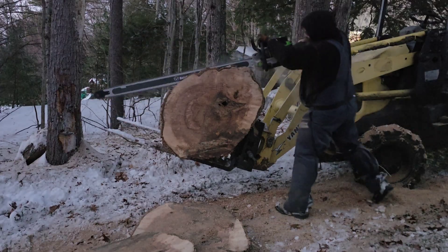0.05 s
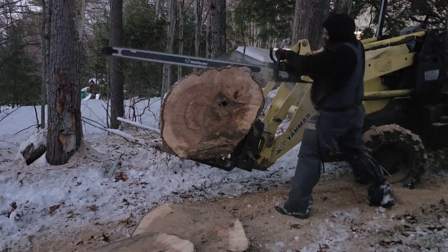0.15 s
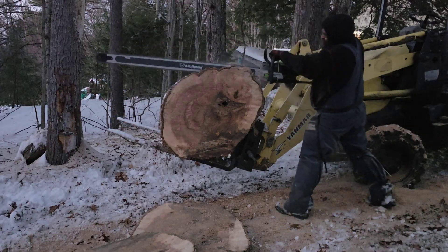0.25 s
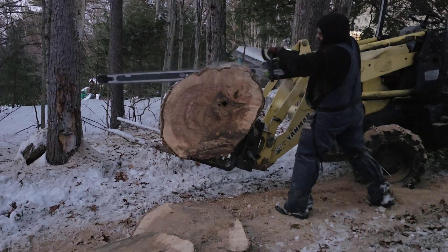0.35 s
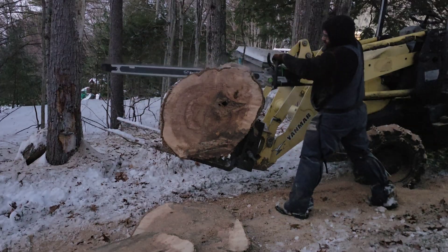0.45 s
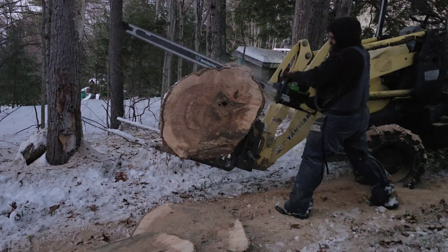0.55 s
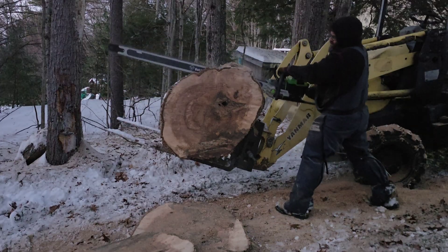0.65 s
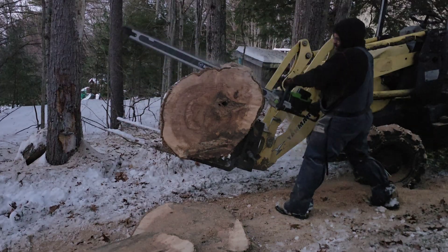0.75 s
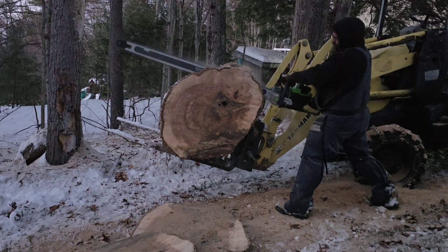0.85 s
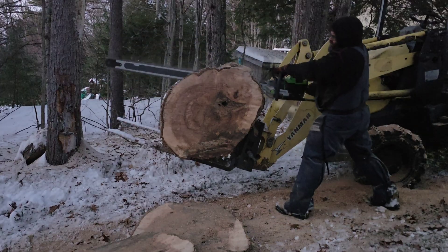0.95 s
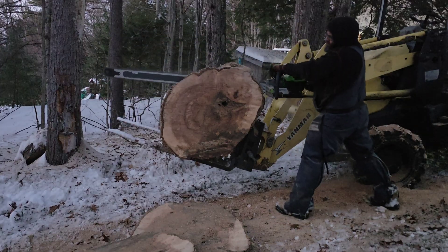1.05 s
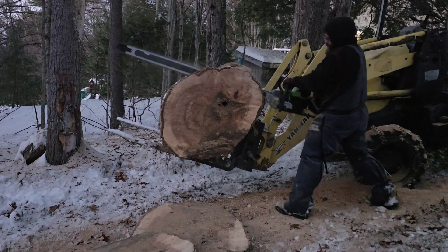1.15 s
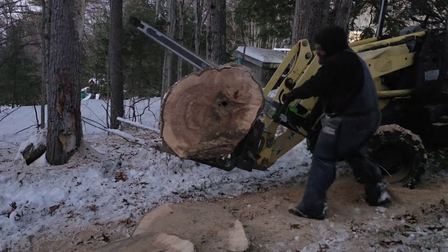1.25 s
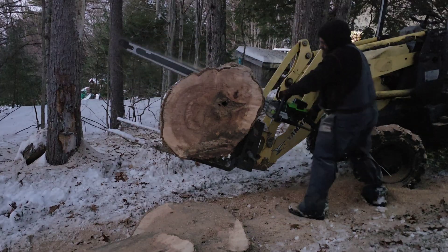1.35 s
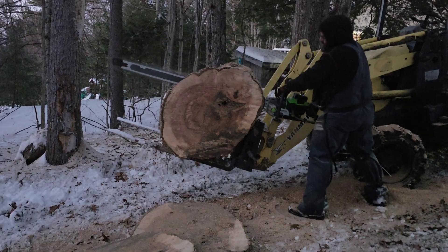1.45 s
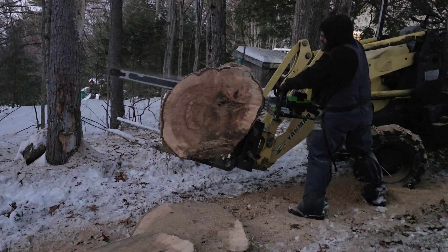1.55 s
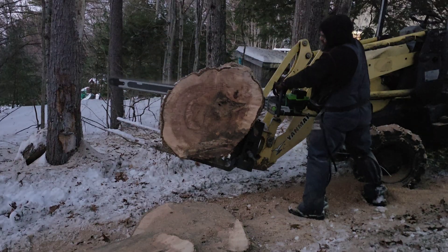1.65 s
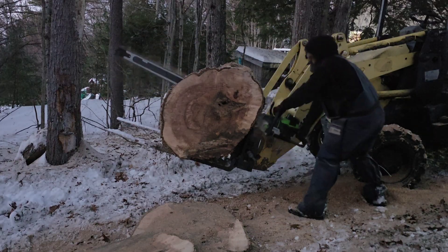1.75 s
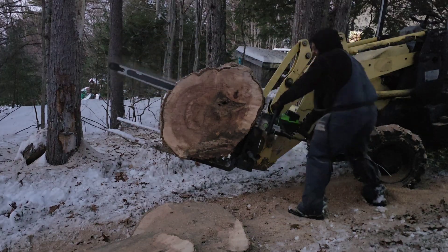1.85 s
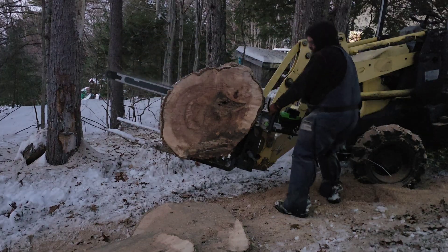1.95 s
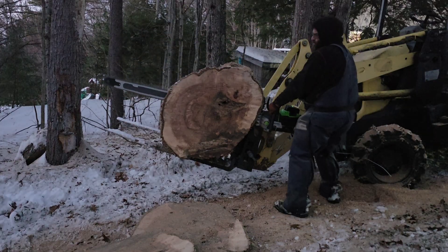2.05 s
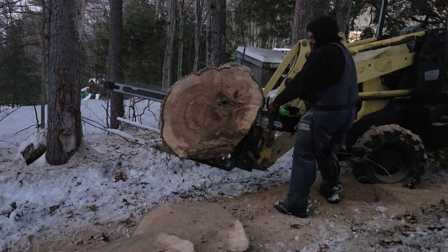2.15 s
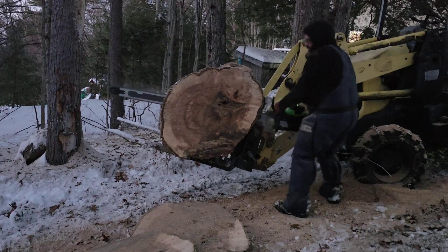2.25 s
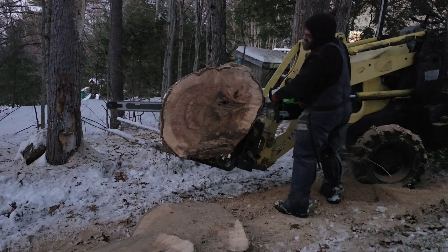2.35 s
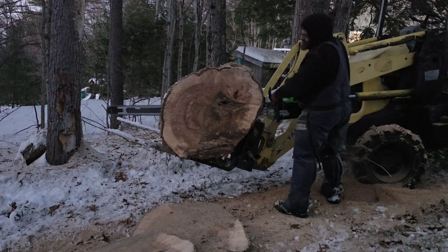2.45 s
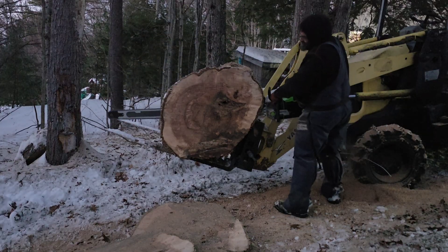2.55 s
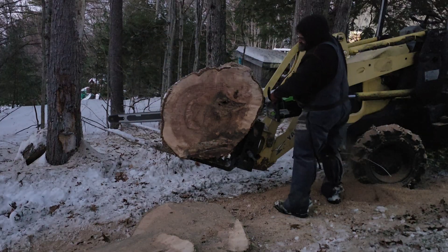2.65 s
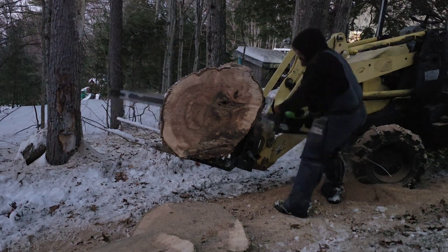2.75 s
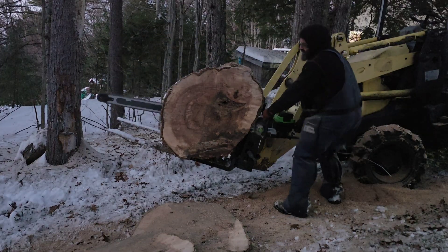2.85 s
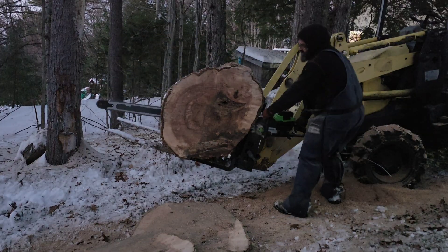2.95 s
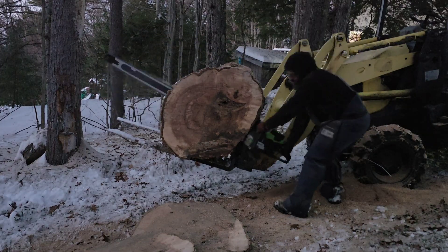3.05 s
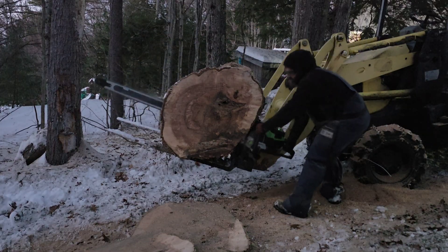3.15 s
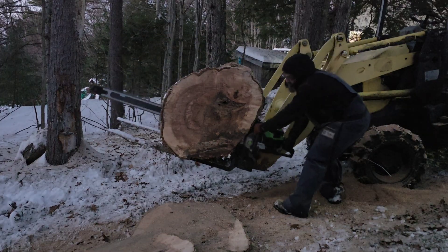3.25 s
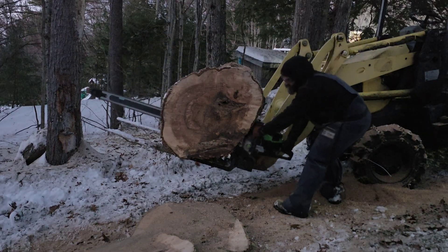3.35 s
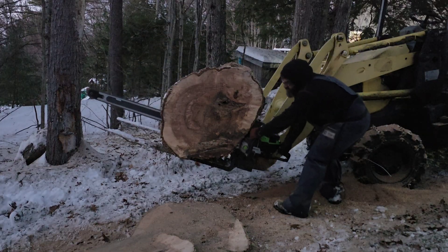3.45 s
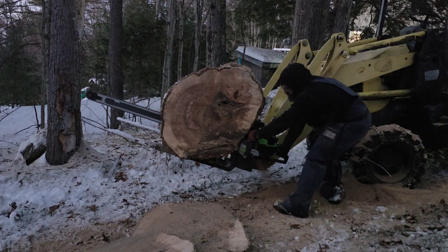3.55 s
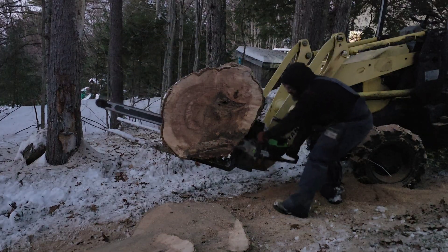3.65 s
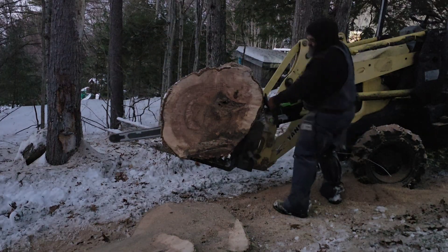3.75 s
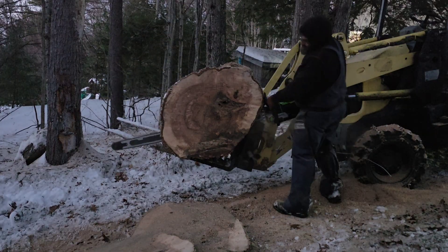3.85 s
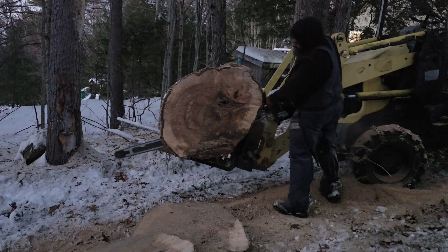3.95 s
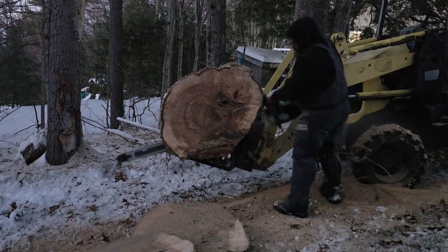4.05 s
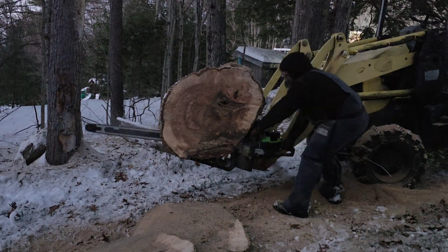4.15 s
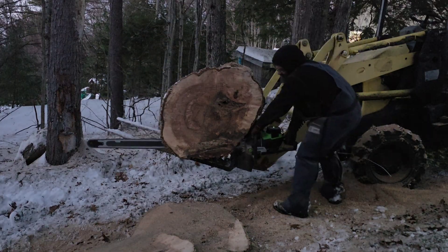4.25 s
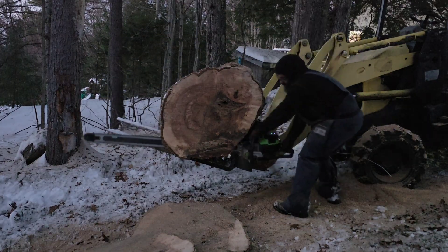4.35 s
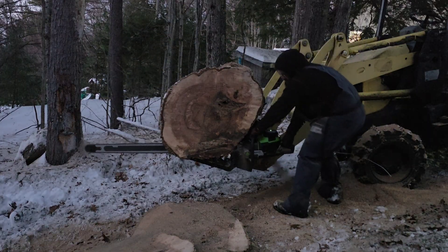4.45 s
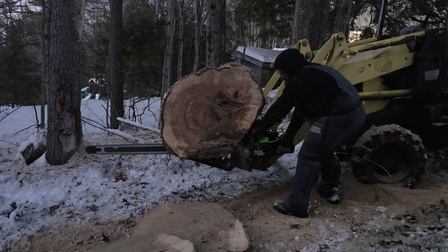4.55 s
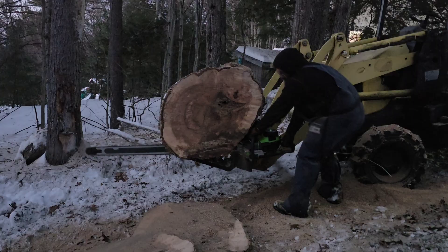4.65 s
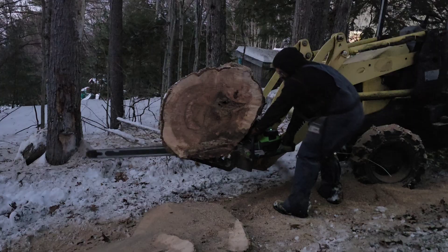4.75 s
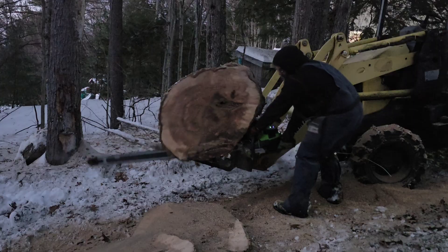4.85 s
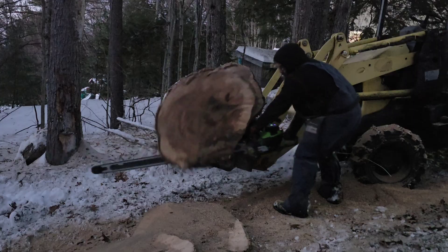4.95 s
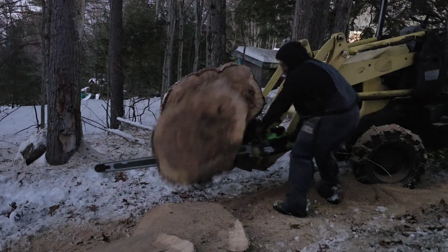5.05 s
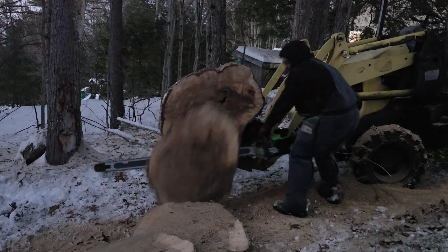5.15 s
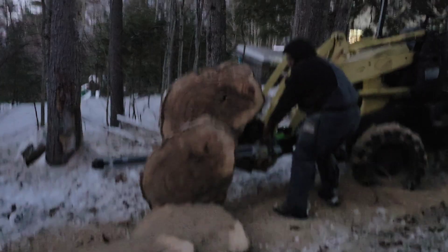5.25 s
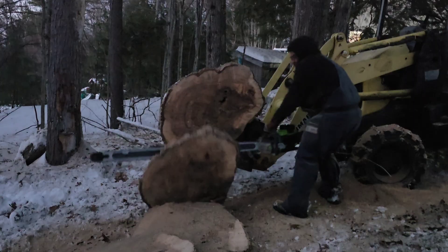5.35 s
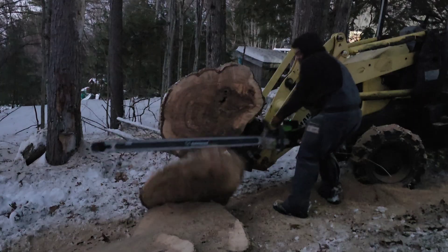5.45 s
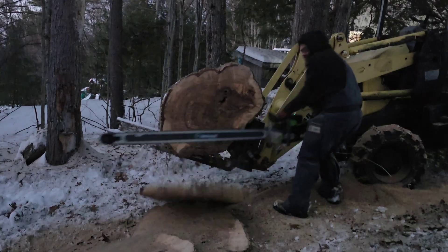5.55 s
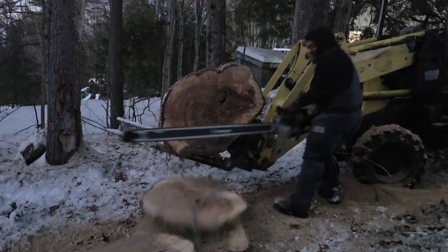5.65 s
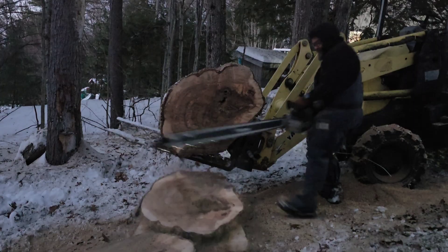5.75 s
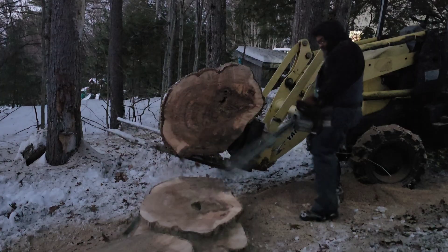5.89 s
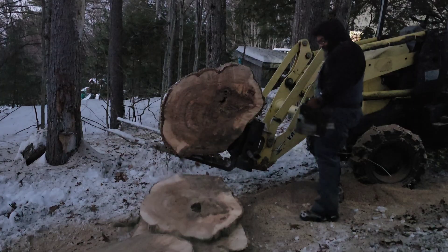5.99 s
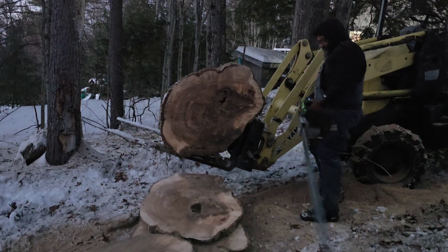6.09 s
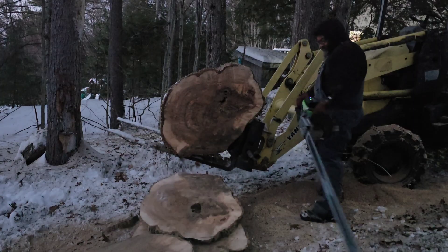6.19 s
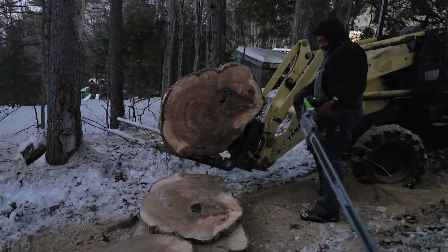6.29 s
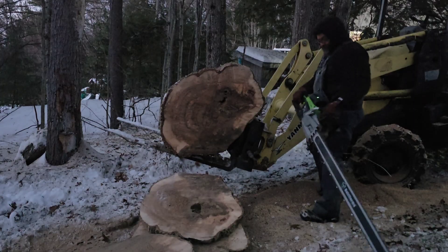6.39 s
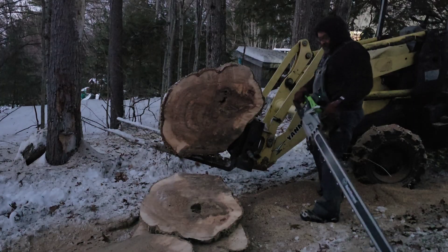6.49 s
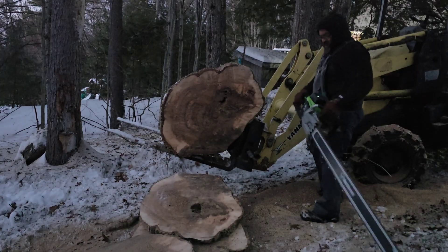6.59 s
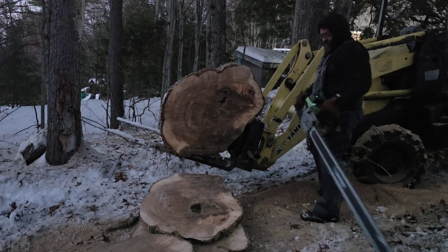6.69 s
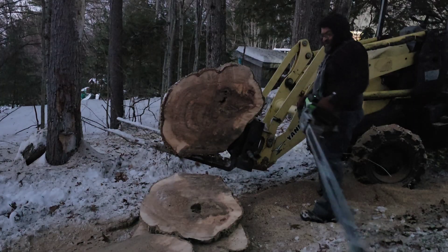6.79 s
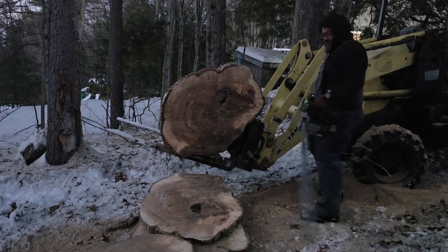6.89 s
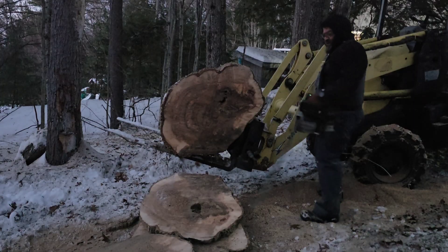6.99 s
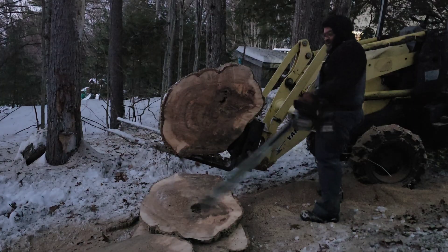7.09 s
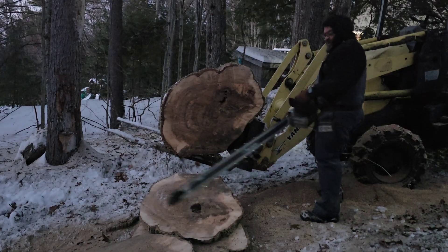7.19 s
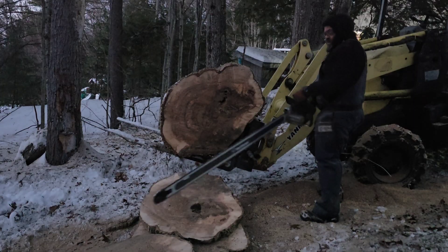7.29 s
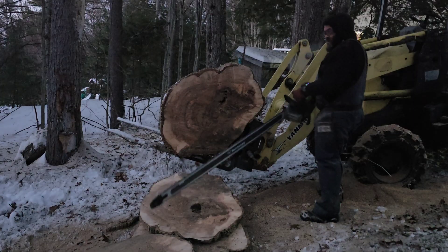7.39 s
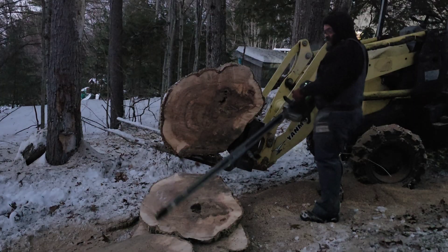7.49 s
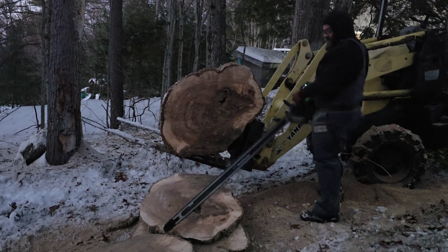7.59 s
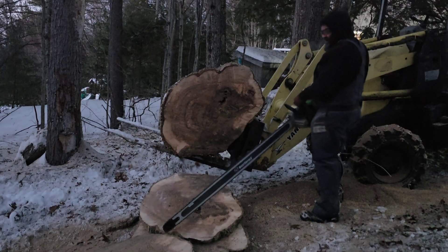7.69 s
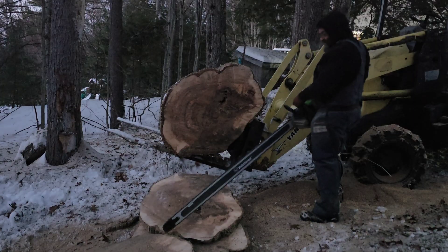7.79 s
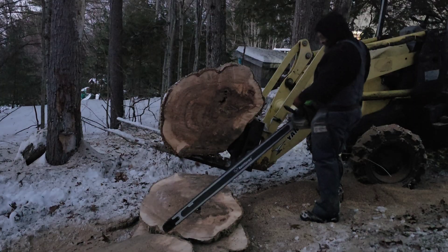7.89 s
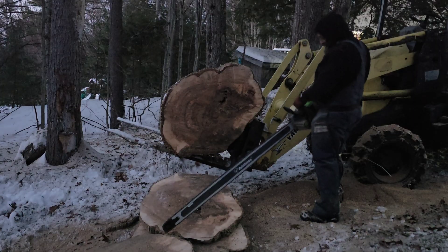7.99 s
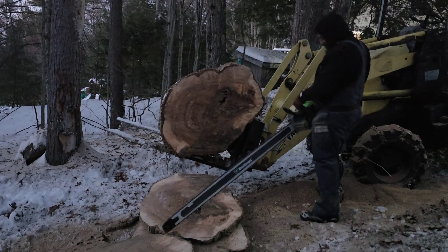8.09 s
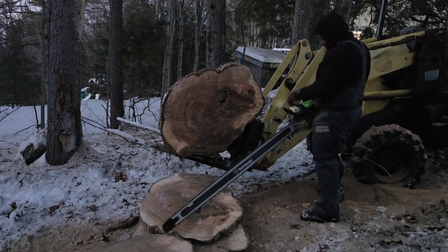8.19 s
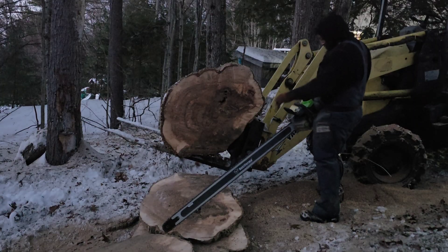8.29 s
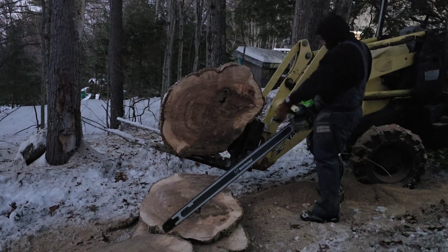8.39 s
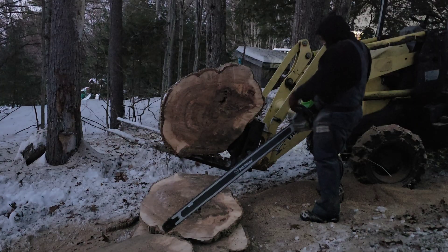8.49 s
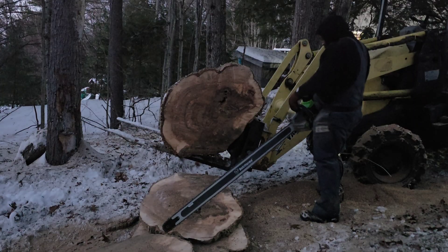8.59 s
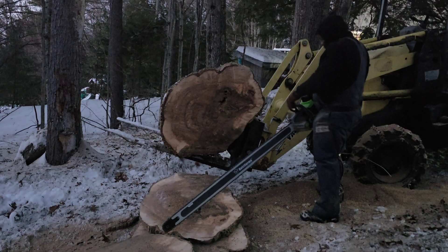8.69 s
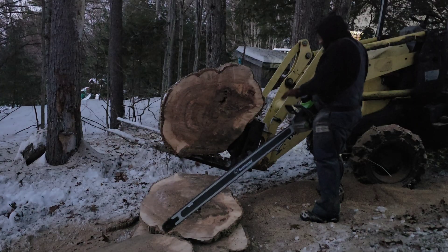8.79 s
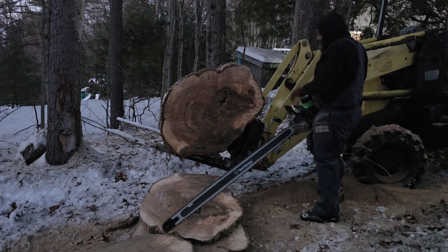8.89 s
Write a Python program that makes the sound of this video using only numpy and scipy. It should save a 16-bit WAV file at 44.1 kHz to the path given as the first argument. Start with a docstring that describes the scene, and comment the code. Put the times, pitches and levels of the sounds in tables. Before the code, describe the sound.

In snowy woods, an electric saw grinds through a log with no engine roar, only fluttering chain tones, woody drone and chip hiss. It bogs down, surges and stalls abruptly. The freed slab lands with a deep boom, bumps, and topples with a hard wooden clap, bark bits trickling and trunks echoing faintly. Over a soft distant rush come a bar knock and brief metallic clicks, heard from nearby.

```python
"""A battery chainsaw with a long bar cuts a slab off a thick log in snowy woods: tones locked to the
link rate sing over noise pulsed by the cutters. The chain snatches as the slab comes free and stops.
The slab thuds on its edge and topples onto other slabs and rocks: decaying sines, struck modes, clicks
and showers of crumbs. The bar is set down on it and the chain gives a last jerk. Trunks echo the
impacts; a far rush of noise fills the woods."""
import sys
import numpy as np
from scipy import signal
from scipy.fft import rfft, irfft
from scipy.io import wavfile

SR = 44100
rng = np.random.default_rng(int(sys.argv[2]) if len(sys.argv) > 2 else 0)


def log_audio(samples):
    """Write samples as a 16-bit WAV file to the path given in sys.argv[1]."""
    # one column per channel
    frames = np.atleast_2d(samples).T
    # limit to full scale, then quantise
    limited = np.clip(frames, -1, 1)
    pcm = np.round(limited * 32767).astype(np.int16)
    wavfile.write(sys.argv[1], SR, pcm)


N = 393813
TIME_S = np.arange(N) / SR
BIN_HZ = np.maximum(np.fft.rfftfreq(N, 1 / SR), 1)

# Chain tones, relative levels: link_rate_multiple, level_db
CHAIN_TONES = [(.5, -9.5), (1, 9), (2, -3), (3, -17)]
# Motor whine, relative levels: link_rate_multiple, level_db
MOTOR_TONES = [(1.66, -9), (2, -3), (2.43, 0), (3, -10)]
# Cut, before trim, load and bite: time_s, log_drone_db, kerf_rasp_db, chip_spray_db
CUT_LEVELS = [(0.0, -60, -40, -43.5), (0.21, -44.5, -39, -44), (0.37, -43.5, -40.5, -44.5),
              (0.44, -42.5, -40, -45.5), (2.31, -46.5, -42, -47), (2.47, -44, -42, -45.5),
              (3.31, -46, -40.5, -44.5), (3.91, -41.5, -43.5, -45.5), (4.2, -48.5, -40, -44),
              (4.31, -43.5, -40, -43.5), (4.87, -52, -42, -42.5), (5.01, -41, -38, -42),
              (5.08, -48, -40.5, -41.5)]
# Spectra of the cut's layers: freq_hz, relative_level_db
DRONE_COLOUR = [(40, -72.5), (100, -55.5), (180, -30), (250, -5), (310, 0.5), (430, 5), (540, 8),
                (620, 3.5), (850, -17)]
RASP_COLOUR = [(450, -32.5), (620, -7.5), (750, -2.5), (870, 1), (1050, -4), (1300, -2.5), (1600, -4.5),
               (1900, -9.5), (2300, -7.5), (2700, -14), (3100, -11), (3800, -39.5)]
SPRAY_COLOUR = [(1650, -28), (2800, -7), (3150, 0), (3900, -2), (4700, 0), (6000, -2), (9000, -1),
                (16000, -6)]
# Spectrum of the snatch: freq_hz, relative_level_db
SNATCH_COLOUR = [(35, -62), (60, -30.5), (189, -26.5), (330, -11), (448, -15.5), (480, -9.5), (842, -5.5),
                 (1090, -8.5), (1580, -7.5), (1950, -15.5), (3670, -13), (10800, -19), (16000, -22.5)]
# Left-right likeness of the saw and crumbs: freq_hz, correlation
SAW_LIKENESS = [(130, 1), (640, 0.96), (1410, 0.94), (3100, 0.43), (6800, 0.32), (15000, 0.25)]
# Brief dips in saw level: centre_s, depth_db, half_width_s
LEVEL_DIPS = [(.34, 5, 0.015), (2.881, 3, 0.02), (3.13, 4, 0.013), (3.6, 3.5, 0.012), (4.402, 13, 0.0065)]
# Saw rocked into the wood, chain dragged down then let go:
# deepest_s, press_s, recovery_s, load_0_to_1, chain_tone_db
BITES = [(.25, .25, .18, .47, -52), (.64, .2, .06, 0.05, -43.5), (0.841, .14, .08, .7, -48.5),
         (1.17, .25, .12, .68, -43.5), (1.5, .18, .16, .66, -57), (1.75, .17, .07, .78, -41.5),
         (1.9, .07, .04, 0.35, -42), (2.032, .09, .08, .45, -55), (2.18, 0.0709, .07, .25, -44.5),
         (2.33, .07, .06, .58, -45.5), (2.72, .4, .07, .28, -44), (2.96, .16, .09, .7, -45.5),
         (3.25, .2, .1, .33, -52.5), (3.551, .2, .07, .62, -49.5), (3.911, .16, .33, .68, -42)]
# Steady push through the last sliver: time_s, load_0_to_1, chain_tone_db, motor_whine_db
LAST_PUSH = [(4.39, 0.02, -46.5, -73), (4.41, .7, -46, -57), (4.52, .75, -41, -57), (4.62, .94, -53, -53.5),
             (4.88, 1, -54, -50), (5.0, .68, -40.5, -52), (5.05, .38, -45, -65), (5.1, .06, -42, -39),
             (5.149, 0.04, -37, -62)]
# Hum of the half-freed slab, lower late in the cut: time_s, pitch_hz, purity_0_to_1, level_db
SLAB_HUM = [(0, 384.2, 0.18, -42.5), (1.6, 390.5, 0, -45.5), (2.55, 407.3, 0.24, -45.5),
            (3.1, 329.4, 0.02, -51), (4.85, 302.8, .2, -48.5), (4.96, 295, 0.85, -39.5),
            (5.13, 325.2, .3, -60.5)]
# Ringing of the long bar: time_s, level_db
BAR_RING = [(0, -49), (.65, -41.5), (1.75, -49), (2.4, -60), (3.0, -58), (3.5, -46), (3.9, -61)]
# Far rush in the woods, spectrum: freq_hz, relative_level_db
AIR_COLOUR = [(25, -24), (45, -24.5), (110, -10.5), (200, -8), (265, -4.5), (340, -5.5), (440, -7),
              (515, -3.5), (600, -7.5), (880, -4.5), (1600, -14.5), (2300, -18.5), (3300, -31), (6000, -43),
              (16000, -71)]
# Far rush, level: time_s, level_db
AIR_LEVEL = [(0, -99), (5.3, -50.5), (6.6, -52.5), (7.3, -51), (8.1, -50.5), (8.9, -49)]
# Far rush, left-right likeness: freq_hz, correlation
AIR_LIKENESS = [(60, 0.92), (180, 0.93), (550, 0.4), (1650, -0.54), (5000, -0.69), (15000, -0.2)]
# Last fibres and bark snapping: start_s, level_db
SNAPS = [(5.26, -32), (5.271, -37), (5.337, -33.5), (5.349, -45), (5.402, -47.5), (5.469, -49.5)]
# Showers of sawdust and bark crumbs, later a faint rustle: thickest_s, level_db, rise_s, t60_s
CRUMB_SHOWERS = [(5.3, -37, 0.018, 0.91), (5.69, -52, 0.077, 0.89), (5.96, -46.5, 0.035, 1.2),
                 (6.7, -67.5, 0.36, 2.7), (7.18, -63.5, 0.22, 3), (8.19, -70.5, .04, 0.58)]
# Spectrum of the crumbs: freq_hz, relative_level_db
CRUMB_COLOUR = [(500, 4.5), (2500, -9), (16000, -18.0)]
# Blows on wood: start_s, level_db, dull_above_hz, contact_t60_s
KNOCKS = [(5.324, -23.5, 440, 0.04), (5.415, -38.5, 370, 0.091), (5.602, -32.5, 616, 0.082),
          (5.665, -22.5, 2470, 0.028), (5.838, -15, 1500, 0.05), (5.844, -11, 1110, 0.021),
          (5.864, -22, 726, 0.14), (5.958, -32, 350, 0.17), (5.99, -34, 294, 0.12), (6.17, -37, 282, 0.21),
          (6.389, -43.5, 3900, 0.025), (7.726, -14.5, 853, 0.026), (7.756, -31.5, 694, 0.037),
          (8.566, -40, 1800, .07), (8.617, -39.5, 3570, 0.052), (8.877, -40, 2490, 0.034)]
# Modes of the slab: freq_hz, relative_level_db, t60_s
SLAB_MODES = [(156.3, -0.5, 0.16), (202.4, -0.5, 0.11), (266, -1.5, 0.123), (312, -7.5, 0.08),
              (408, 2.5, 0.029), (504, 0, 0.049), (634, 0.5, 0.014), (737, -1.5, 0.051), (864, -13, 0.056),
              (930, -6, 0.047), (1052, -7, 0.033), (1325, -3.5, 0.033), (1670, -24, 0.13)]
# Clicks of chain, bark and grit: start_s, level_db, t60_s, dull_above_hz
CLICKS = [(5.328, -34, 0.11, 5860), (5.401, -41.5, 0.14, 2130), (5.503, -52.5, 0.024, 4440),
          (5.602, -44, 0.09, 8900), (5.665, -39.5, 0.057, 5200), (5.842, -47.5, .05, 4940),
          (5.861, -53.5, 0.87, 2200), (6.389, -58, .025, 3970), (6.463, -47, 0.4, 8330),
          (7.726, -35, 0.15, 8910), (7.76, -33.5, 0.028, 10500), (7.807, -37.5, 0.061, 9700),
          (8.547, -54.5, 0.25, 6960), (8.581, -46, 0.11, 13900), (8.6159, -27.5, 0.018, 13000),
          (8.624, -39, 0.13, 12900), (8.882, -55, 0.079, 8750)]
# Weight meeting the ground: start_s, level_db, pitch_hz, t60_s
THUDS = [(5.336, -0.5, 85, 0.085), (5.608, -10.5, 67, 0.064), (5.674, -25, 58.5, 0.071),
         (5.84, -5.5, 100, 0.048), (5.952, -20, 126, 0.11), (5.997, -21.5, 133, 0.099),
         (6.172, -27.5, 129, 0.23), (6.19, -31, 71, 0.2), (7.726, -18, 123.6, 0.2)]
# Decay of the woods' echo: freq_hz, t60_s
WOODS_T60 = [(60, 0.47), (300, 0.16), (1200, 0.75), (4000, 0.44), (14000, 0.36)]
# Response of the two microphone ports: freq_hz, left_db, right_db
PORTS = [(300, -1.66, -2.5), (1300, 0.5, -1.14), (2200, 1.34, -1.6), (5900, -2.5, -6.5), (7600, -1.5, -8),
         (9940, -1, -21), (10740, -9, -12), (11900, -4, -10.5), (15500, 3.5, -6.5)]

FLUTTER_HZ, FLUTTER_END_S = 43.07, 4.4
# drive links passing the sprocket with no load, and the loss at full load
FREE_LINKS_PER_S, SAG_LINKS_PER_S = 1230, 400
# change at full load: a laden chain sounds deeper
DRONE_LOAD_DB, RASP_LOAD_DB, SPRAY_LOAD_DB = 3.5, -2.5, -2
# log thrum: level at start unloaded, gain at full load, growth as the cut deepens
THRUM_DB, THRUM_LOAD_DB, THRUM_DB_PER_S = -74.5, 4, 2
# the chain snatches at the loose slab and stalls
SNATCH_S, SNATCH_ATTACK_S, SNATCH_FADE_S, STALL_S = 5.146, .022, 0.067, .1
SNATCH_DB, SNATCH_TONE_DB = -16, -23
# the chain's last jerk
JERK_S, JERK_WIDTH_S, JERK_DB, JERK_LINKS_PER_S, JERK_SLOWING_S = 8.665, 0.037, -43, 460, 0.8
# low rumble after every thud; level relative to the thud
GROUND_HZ, GROUND_WIDTH_HZ, GROUND_DB, GROUND_T60_S, GROUND_RISE_S = 54, 19.5, -13.5, 0.47, 0.016


def from_db(db):
    """Decibels to gain."""
    return 10 ** (np.asarray(db) / 20)


def decay(t, t60_s):
    """Exponential decay, 60 dB per t60."""
    return from_db(-60 * t / t60_s)


def rise(t, rise_s):
    """Exponential approach to 1."""
    return 1 - np.exp(-t / rise_s)


def bump(centre_s, width_s):
    """Gaussian bump in time, peak 1."""
    return np.exp(-((TIME_S - centre_s) / width_s) ** 2)


def rms_one(x):
    """Scale to unit power."""
    return x / np.sqrt(np.mean(x ** 2) + 1e-20)


def in_time(rows):
    """Each column of a curve, sample by sample."""
    s, *columns = np.transpose(rows)
    return [np.interp(TIME_S, s, column) for column in columns]


def at_hz(points, hz):
    """Read a table on a log-frequency axis."""
    table_hz, value = np.transpose(points)
    return np.interp(np.log(hz), np.log(table_hz), value)


def phase(hz):
    """Integrate frequency to radians."""
    return 2 * np.pi * np.cumsum(hz) / SR


def drift(rate_hz):
    """Low-passed noise, rms 1, computed at an eighth of the sample rate."""
    pole = np.exp(-16 * np.pi * rate_hz / SR)
    noise = rng.standard_normal(N // 8 + 2002)
    slow = signal.lfilter([1], [1, -2 * pole, pole * pole], noise)[2000:]
    return np.interp(np.arange(N) / 8, np.arange(len(slow)), rms_one(slow))


def blurred(turn, width_hz):
    """A tone smeared into a narrow band, with the power of a unit sine."""
    return (drift(width_hz) * np.sin(turn) + drift(width_hz) * np.cos(turn)) / np.sqrt(2)


def filtered(x, hz, kind, order=2):
    """Causal Butterworth filter."""
    sos = signal.butter(order, np.clip(hz, 10, .45 * SR), kind, fs=SR, output="sos")
    return signal.sosfilt(sos, x + 1e-18)


def coloured(colour, likeness, drive=1):
    """Stereo noise, pulsed by the drive and then shaped by a spectrum; the middle has rms 1."""
    mid, side = rfft(rng.standard_normal((2, N)) * drive)
    alike = np.clip(at_hz(likeness, BIN_HZ), -.9, .999)
    pair = np.sqrt(1 + alike) * mid + np.sqrt(1 - alike) * side * [[1], [-1]]
    out = irfft(pair * from_db(at_hz(colour, BIN_HZ)), N)
    return out / out.mean(axis=0).std()


def add(track, s, sound):
    """Mix a sound in at a time."""
    part = track[round(s * SR):][:len(sound)]
    part += sound[:len(part)]


def at_level(hit, db):
    """Set the rms of a hit's first fiftieth of a second."""
    return from_db(db) * hit / hit[:SR // 50].std()


def chain_load():
    """Chain load, 0-1: each bite ramps up and lets go, then comes the last push."""
    load = in_time(LAST_PUSH)[0]
    for s, press_s, recovery_s, bite_load, _ in BITES:
        load = load + bite_load * np.interp(TIME_S, [s - press_s, s, s + recovery_s], [0, 1, 0])
    return load


def chain_speed(load):
    """Links per second: the chain sags under load, stalls after the snatch and twitches once more."""
    stalled_s = np.maximum(TIME_S - SNATCH_S - SNATCH_ATTACK_S, 0)
    running = (FREE_LINKS_PER_S - SAG_LINKS_PER_S * load) * np.exp(-stalled_s / STALL_S)
    jerk_s = np.maximum(TIME_S - JERK_S, -2 * JERK_WIDTH_S)
    jerk = JERK_LINKS_PER_S * np.exp(-jerk_s / JERK_SLOWING_S)
    return np.where(TIME_S < (SNATCH_S + JERK_S) / 2, running, jerk)


def snatch_force():
    """The snatch grips fast and fades as the chain stalls, 0-1."""
    t = TIME_S - SNATCH_S
    fade = np.exp(-(np.maximum(t - SNATCH_ATTACK_S, 0) / SNATCH_FADE_S) ** 2)
    return np.clip(t / SNATCH_ATTACK_S, 0, 1) * fade


def kerf_noise(load, teeth, bite_db=1.05, drone_trim_db=-2.0, rasp_trim_db=-0.5, spray_trim_db=5.0):
    """Cutter-pulsed noise: the log drones, the kerf rasps, chips spray."""
    drone_db, rasp_db, spray_db = in_time(CUT_LEVELS)
    # hard and soft wood make the bite uneven
    bite = bite_db * drift(22)
    drone_gain = from_db(drone_db + drone_trim_db + DRONE_LOAD_DB * load + bite)
    rasp_gain = from_db(rasp_db + rasp_trim_db + RASP_LOAD_DB * load + bite)
    spray_gain = from_db(spray_db + spray_trim_db + SPRAY_LOAD_DB * load)
    drone = drone_gain * coloured(DRONE_COLOUR, SAW_LIKENESS, teeth)
    rasp = rasp_gain * coloured(RASP_COLOUR, SAW_LIKENESS, teeth)
    return drone + rasp + spray_gain * coloured(SPRAY_COLOUR, SAW_LIKENESS, teeth)


def resonances(load, bar_hz=870, bar_width_hz=55, slab_width_hz=70, log_hz=180, log_width_hz=28):
    """The cutters shake the slab, the bar and the log, each at its own pitch."""
    hz, purity, slab_db = in_time(SLAB_HUM)
    bar_db, = in_time(BAR_RING)
    thrum_db = THRUM_DB + THRUM_LOAD_DB * load + THRUM_DB_PER_S * TIME_S
    thrum_gain = from_db(thrum_db) * (TIME_S < FLUTTER_END_S)
    turn, purity = phase(hz), np.clip(purity, 0, 1)
    slab = np.sqrt(purity) * np.sin(turn) + np.sqrt(1 - purity) * blurred(turn, slab_width_hz)
    bar = blurred(2 * np.pi * bar_hz * TIME_S, bar_width_hz)
    log = blurred(2 * np.pi * log_hz * TIME_S, log_width_hz)
    # small parts radiate no bass
    small_parts = filtered(from_db(slab_db) * slab + from_db(bar_db) * bar, 235, "high", order=4)
    return np.sqrt(2) * (small_parts + thrum_gain * log)


def chain_song(links, turn, blur_share, grip, in_kerf, blur=0.55, blur_hz=42):
    """Link-rate tones sing in bites, last push, snatch and jerk; the motor whines above them."""
    # tones are smeared into narrow bands, most while the speed changes
    speed_change = np.minimum(np.abs(np.gradient(links)) * SR / 1500, 1)
    smear = blur * (blur_share / 2 + speed_change)
    tones = sum(from_db(db) * (np.sin(k * turn) + smear * blurred(k * turn, blur_hz))
                for k, db in CHAIN_TONES)
    tones = rms_one(tones / np.sqrt(1 + smear ** 2))
    motor = rms_one(sum(from_db(db + 2 * drift(31)) * np.sin(k * turn + .5 * drift(50))
                        for k, db in MOTOR_TONES))
    bite_tones = [(row[0], row[-1]) for row in BITES]
    push_tones = [(s, db) for s, _, db, _ in LAST_PUSH]
    sing_db, = in_time(bite_tones + push_tones)
    jerk = from_db(JERK_DB) * bump(JERK_S, JERK_WIDTH_S)
    sing = from_db(sing_db) * in_kerf + from_db(SNATCH_TONE_DB) * grip ** 2 + jerk
    whine_gain = from_db(in_time(LAST_PUSH)[2]) * in_kerf
    return sing * from_db(2.8 * blur_share * drift(26)) * tones + whine_gain * motor


def saw(flutter=0.13, slow_waver=.016, fast_waver=.012, tooth_bite=0.33, grain_db=-1.0):
    """Cutters tear chips at half the link rate, driving kerf noise, chain song and snatch."""
    load = chain_load()
    links, grip = chain_speed(load), snatch_force()
    fluttering = TIME_S < FLUTTER_END_S
    # the pitch wavers and blurs while the sound flutters, and is steadier after
    blur_share = np.where(fluttering, 1, .4)
    waver = fast_waver * drift(69.8) + slow_waver * drift(18)
    turn = phase(links * (1 + blur_share * waver))
    teeth = np.exp(tooth_bite * np.cos(turn / 2)) * from_db(grain_db * drift(500))
    in_kerf = np.interp(TIME_S, [5.17, 5.28], [1, 0])
    cutting = (kerf_noise(load, teeth) + resonances(load)) * in_kerf
    song = chain_song(links, turn, blur_share, grip, in_kerf)
    snatch = from_db(SNATCH_DB) * grip * coloured(SNATCH_COLOUR, SAW_LIKENESS, teeth)
    # level flutters quickly through most of the cut
    throb = 1 + flutter * fluttering * np.sin(2 * np.pi * FLUTTER_HZ * TIME_S)
    dips_db = sum(depth_db * bump(s, width_s) for s, depth_db, width_s in LEVEL_DIPS)
    return (cutting + song) * throb * from_db(-dips_db) + snatch


def air():
    """Far rush in the woods: coloured noise with a slowly moving level."""
    return from_db(in_time(AIR_LEVEL)[0]) * coloured(AIR_COLOUR, AIR_LIKENESS)


def crumbs(grain_db=2.5):
    """A fine patter follows the slab down; each shower swells and dies away."""
    showers = np.zeros(N)
    for s, db, rise_s, t60_s in CRUMB_SHOWERS:
        swell = np.exp(-(np.minimum(TIME_S - s, 0) / rise_s) ** 2)
        showers += from_db(db) * decay(np.maximum(TIME_S - s, 0), t60_s) * swell
    return showers * coloured(CRUMB_COLOUR, SAW_LIKENESS, from_db(grain_db * drift(200)))


def snaps(low_hz=3200, high_hz=5200, t60_s=0.02):
    """Dry fibres break with a brief bright ring."""
    out, t = np.zeros(N), TIME_S[:SR // 10]
    for s, db in SNAPS:
        burst = rng.standard_normal(len(t)) * decay(t, t60_s)
        add(out, s, at_level(filtered(burst, [low_hz, high_hz], "band"), db))
    return out


def knocks(crunch=0.19, dead_wood=0.68, lowest_hz=150, settle_s=0.00047):
    """A push and a crunch of rough faces excite the slab's modes; soft contacts are duller."""
    out, t = np.zeros(N), TIME_S[:SR // 2]
    for s, db, dull_hz, contact_t60_s in KNOCKS:
        contact = crunch * rng.standard_normal(len(t)) * decay(t, contact_t60_s) * rise(t, settle_s)
        contact[0] += 1  # the push
        body = np.zeros(len(t))
        for k, (hz, mode_db, t60_s) in enumerate(SLAB_MODES):
            mode = decay(t, t60_s) * np.sin(2 * np.pi * hz * t)
            ring = signal.fftconvolve(contact, mode)[:len(t)]
            body += from_db(mode_db) * (-1) ** k * rms_one(ring)
        # between the clear modes lie many that die at once
        slap = filtered(contact, [lowest_hz, 1700], "band")
        blow = filtered(rms_one(body) + dead_wood * rms_one(slap), dull_hz, "low", order=4)
        # a short hard contact hardly moves the lowest modes
        add(out, s, at_level(filtered(blow, dull_hz / 10, "high"), db))
    return out


def clicks(grain_db=-4.5, lowest_hz=700, rise_s=0.00058):
    """Each click is a dying cluster of tiny hard contacts."""
    out, t = np.zeros(N), TIME_S[:SR // 2]
    for s, db, t60_s, dull_hz in CLICKS:
        grains = rng.standard_normal(len(t)) * from_db(grain_db * rng.standard_normal(len(t)))
        grains = grains * decay(t, t60_s) * rise(t, rise_s)
        bright = filtered(grains, lowest_hz, "high")
        add(out, s, at_level(filtered(bright, dull_hz, "low", order=1), db))
    return out


def thuds(rise_s=0.0014):
    """The ground gives under the slab, swings a few times and rumbles on."""
    out, rumble, t = np.zeros(N), np.zeros(N), TIME_S[:SR]
    for s, db, hz, t60_s in THUDS:
        swing = decay(t, t60_s) * rise(t, rise_s) * np.sin(2 * np.pi * hz * t)
        add(out, s, from_db(db) * swing)
        add(rumble, s, from_db(db + GROUND_DB) * decay(t, GROUND_T60_S) * rise(t, GROUND_RISE_S))
    return out + rumble * blurred(2 * np.pi * GROUND_HZ * TIME_S, GROUND_WIDTH_HZ)


def woods(x, build_s=0.015):
    """Trunks scatter a thin tail back, different at each ear."""
    t, edges_hz = TIME_S[:SR], np.geomspace(30, 16000, 10)
    tail = np.zeros((2, SR))
    for low_hz, high_hz in zip(edges_hz, edges_hz[1:]):
        band = filtered(rng.standard_normal((2, SR)), [low_hz, high_hz], "band")
        tail += band * decay(t, at_hz(WOODS_T60, np.sqrt(low_hz * high_hz)))
    tail = rms_one(tail * rise(t, build_s)) / np.sqrt(SR)
    return signal.fftconvolve(x[None], tail, axes=1)[:, :N]


def scuff(s=7.5, width_s=0.0483, level_db=-45, start_hz=1520, end_hz=1270, width_hz=190):
    """A faint falling squeak as the saw is swung round: a narrow noise band."""
    hz = np.interp(TIME_S, [s - width_s, s + width_s], [start_hz, end_hz])
    return from_db(level_db) * bump(s, width_s) * blurred(phase(hz), width_hz)


def scene(click_width=0.92, wood_echo_db=-21, click_echo_db=-17):
    """Saw, falling slab and small clicks over the far rush of the woods."""
    wood, ticks = thuds() + knocks() + scuff(), clicks()
    wide_ticks = click_width * clicks() * [[1], [-1]]  # opposite sign left and right
    near = wood + snaps() + ticks + wide_ticks
    echo = woods(from_db(wood_echo_db) * wood + from_db(click_echo_db) * ticks)
    return saw() + near + crumbs() + echo + air()


def record(dry, low_cut_hz=25, high_cut_hz=16000, left_lag_s=.00002):
    """Each port has its own colour, the left one lags; deepest bass and top are cut."""
    ports = from_db([at_hz(np.array(PORTS)[:, [0, side]], BIN_HZ) for side in (1, 2)])
    lag = np.exp(-2j * np.pi * BIN_HZ * np.array([[left_lag_s], [0]]))
    heard = filtered(irfft(rfft(dry) * ports * lag, N), low_cut_hz, "high")
    top_cut = signal.ellip(12, .1, 80, high_cut_hz, fs=SR, output="sos")
    return signal.sosfilt(top_cut, heard)


dry = scene()
out = record(dry)
log_audio(out)
```